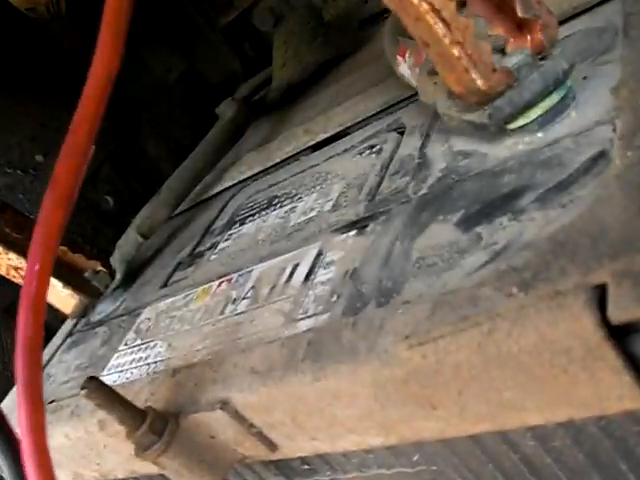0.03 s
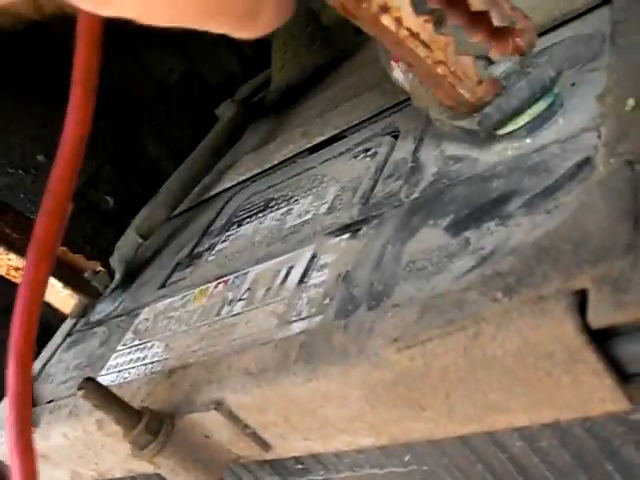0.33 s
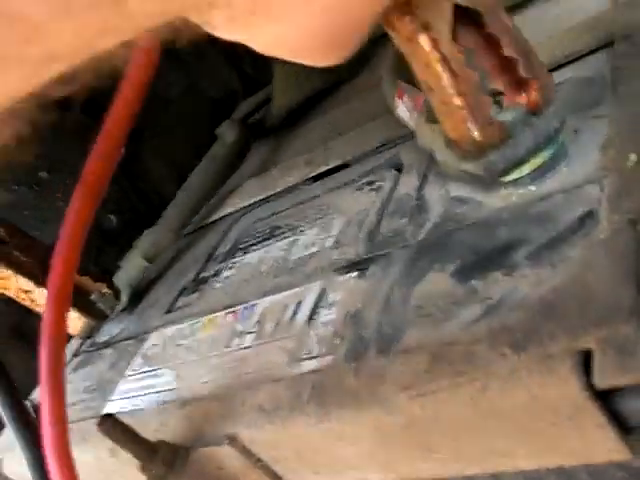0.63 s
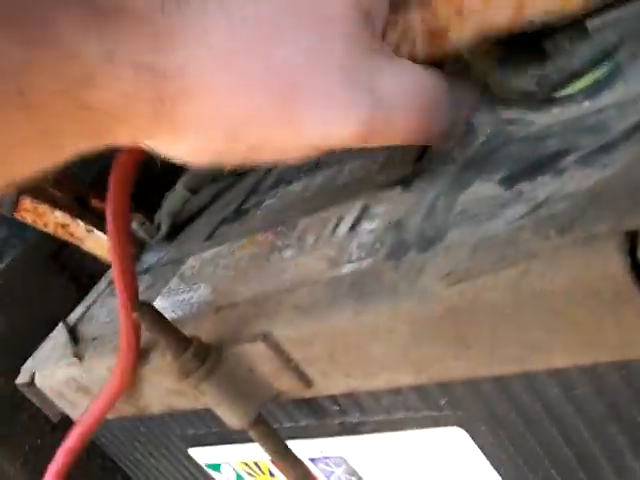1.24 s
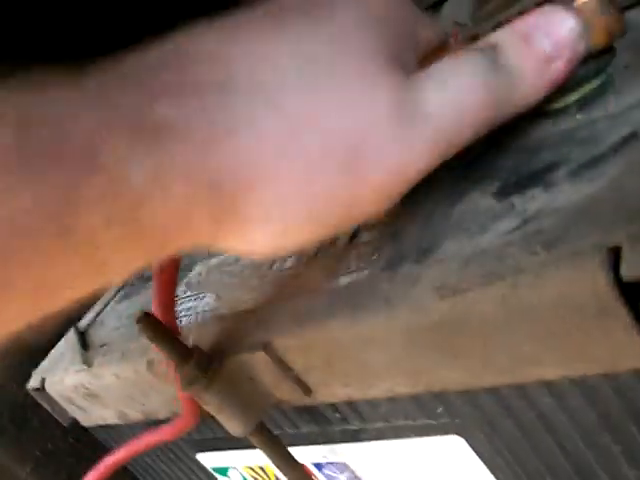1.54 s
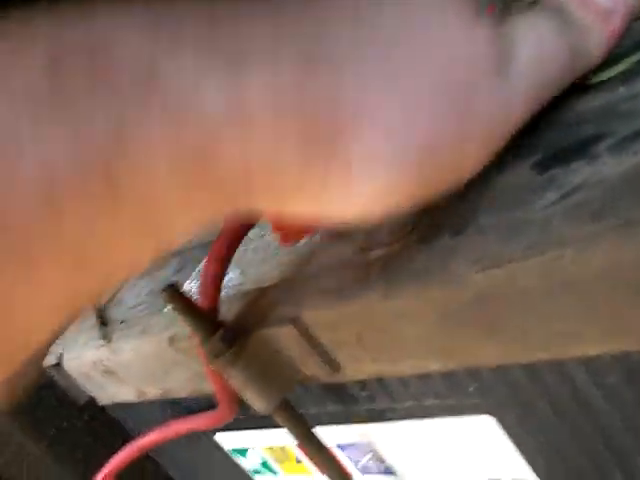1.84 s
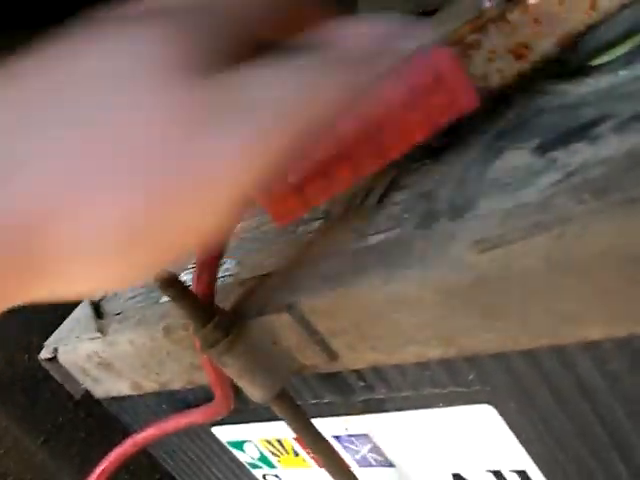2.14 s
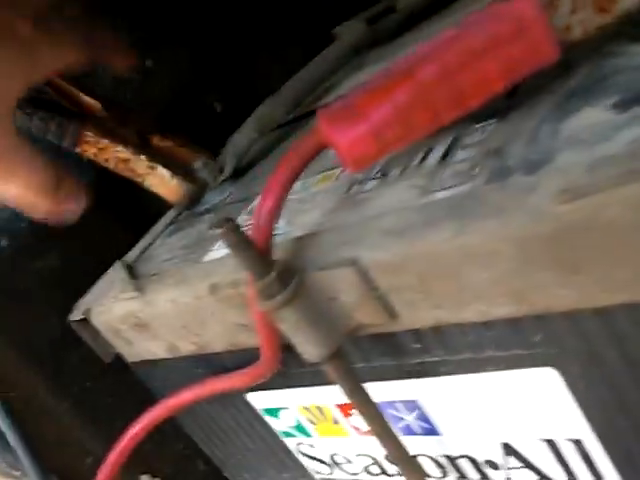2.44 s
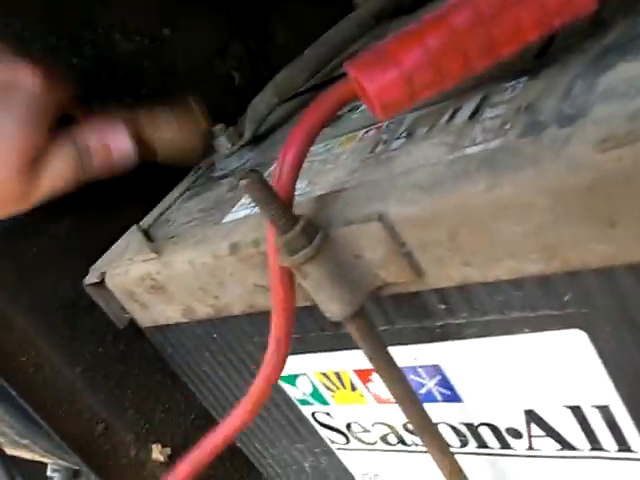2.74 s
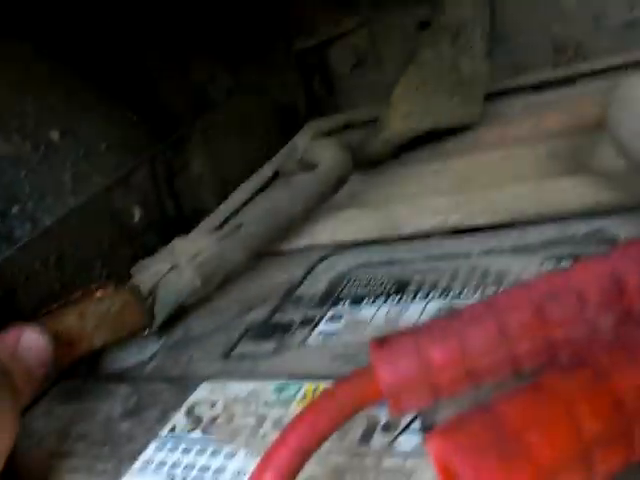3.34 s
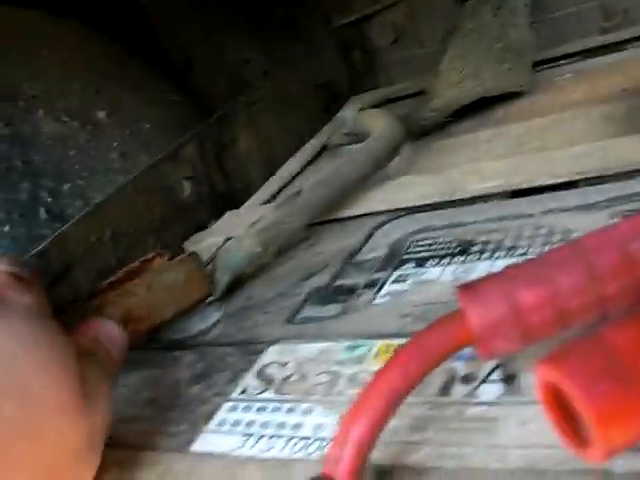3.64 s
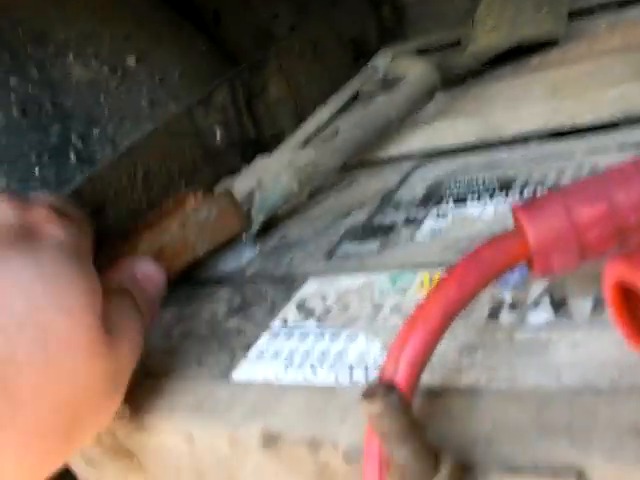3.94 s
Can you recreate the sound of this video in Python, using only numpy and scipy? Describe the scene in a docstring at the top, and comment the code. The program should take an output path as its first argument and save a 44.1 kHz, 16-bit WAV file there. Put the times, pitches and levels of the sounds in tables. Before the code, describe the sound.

A steel jumper clamp clicks, slips and snaps onto a battery terminal close to the microphone, thumping the case. Small clicks and scrapes of cable handling follow, while an engine idles with a low throb throughout.

```python
"""An engine idles under a faint, high ticking while a sprung jumper clamp is worked onto a battery terminal.
The steel jaws slip twice with a short groan, then snap shut at 0.9 s and thump the battery case.
Distant walls answer. The recorder's gain control ducks on the loud snaps and creeps back, so the engine
fades in again. Small clicks and scrapes follow as the cables are handled, and after 3 s a boom from
one corner of the engine bay swells."""
import sys
import numpy as np
from scipy import signal
from scipy.fft import rfft, irfft, next_fast_len
from scipy.io import wavfile
from scipy.ndimage import uniform_filter1d, map_coordinates

SR = 44100
rng = np.random.default_rng(int(sys.argv[2]) if len(sys.argv) > 2 else 0)


def wav_record(signal):
    """Record a signal, one row per channel, as 16-bit PCM in the file named by sys.argv[1]."""
    frames = np.transpose(np.atleast_2d(signal))
    bounded = np.clip(frames, -1, 1)
    # unit amplitude maps onto the largest positive 16-bit level
    quanta = np.round(bounded * 32767).astype(np.int16)
    wavfile.write(sys.argv[1], SR, quanta)


N = 176400
TIME = np.arange(N) / SR
TOP_HZ = 12100

# idle speed of the engine (time [s], speed [turns/s])
IDLE_SPEED = [(0, 15.2), (.7, 15.2), (.85, 15.02), (1.5, 15.05), (1.7, 15.19), (3.5, 15.22), (3.8, 15.6),
              (4, 15.55)]
# tone of the body that the beats ring in (frequency [Hz], gain [dB])
BODY_EQ = [(15, -37), (45, -23.5), (62, -3), (78, 3), (106, 4), (135, -9.5), (170, 0), (200, -6),
           (243, -11.5), (290, -24), (385, -24.5), (480, -29), (900, -43.5), (2000, -57), (5000, -120)]
# tone of the rush of fan and belts (frequency [Hz], gain [dB])
RUSH_EQ = [(25, -24.5), (45, -21.5), (62, -6.5), (100, 1.5), (140, -6.5), (185, 1), (235, -5), (280, -9),
           (345, -15.5), (420, -9), (500, -16), (780, -19), (1050, -21), (1400, -30.5), (2700, -34.5),
           (4000, -40), (7000, -43), (8500, -49), (12000, -51)]
# resonances of the engine bay (frequency [Hz], lift [dB])
BAY_RESONANCES = [(316, 9.5), (385, 12.5), (556, 7.5), (760, 10), (856, 1.5)]
# the rush as the microphone moves (time [s], level [dB])
RUSH_FADER = [(0, -27.5), (.35, -26.5), (.75, -25), (1.2, -27), (2.2, -27), (3, -26.5), (3.4, -29),
              (4, -29)]
# tone of the belts' rasp (frequency [Hz], gain [dB])
RASP_EQ = [(800, -40), (1700, -13.5), (2250, -0.5), (2750, -3), (3300, -15.5), (4300, -6), (5500, -16),
           (12000, -39.5)]
# the rasp as the microphone moves (time [s], level [dB])
RASP_FADER = [(0, -54), (.7, -49), (1.3, -53.5), (4, -58.5)]
# boom from a corner of the bay, louder as the microphone nears it (time [s], level [dB])
BOOM_FADER = [(0, -39), (1.498, -41), (2.998, -40), (3.399, -29.5), (4, -31)]
# tone of the airy wash from that corner (frequency [Hz], gain [dB])
AIR_EQ = [(250, -26), (460, 3), (600, 1), (780, -13), (1000, -7), (1300, -9), (1700, -36), (3800, -34),
          (5200, -22.5), (7000, -35), (12000, -49.5)]
# scrapes of jaws and cable (time [s], length [s], level [dB], tilt [dB/octave])
SCRAPE_CUES = [(0.053, 0.11, -49, 2), (0.88, 0.0044, -23, 1), (.885, 0.0047, -7, -3.5),
               (1.394, 0.039, -38, 4), (1.515, 0.041, -46, -0.5), (1.801, 0.056, -41.5, 8.5),
               (2.628, 0.065, -40, -3), (2.711, .063, -40, -2), (3.138, .036, -40.5, -5),
               (3.286, 0.034, -42, -4.5), (3.323, 0.039, -42.5, -5), (3.843, .13, -53.5, 3)]
# tone of the steel jaws (frequency [Hz], gain [dB])
JAW_EQ = [(300, 3), (850, 2), (1150, -3), (1550, -8), (1900, -4), (2500, -2.5), (3400, -1), (4100, -1),
          (4900, -2), (6500, -6), (8200, -9.5), (12000, -13)]
# jaw contacts (time [s], level [dB], low cut [Hz], main pitch [Hz], its width [octaves], its lift [dB],
# tilt [dB/octave], clatter t60 [s], lid knock relative to the hit [dB])
CONTACT_CUES = [(.492, -41, 3000, 4450, 1, 11, -7, .011, -20),
                (0.7787, -9, 1470, 3700, 0.66, 1, 0.5, .036, -19),
                (0.835, -13, 2030, 3100, .45, 13, -5, .026, -9),
                (.8391, -11.5, 1990, 3560, 0.32, 14.5, 4.5, .02, -14),
                (0.8875, 7.5, 1900, 3400, 0.24, 10.5, 2, 0.041, -7.5),
                (0.8942, 2, 1970, 3587, .33, 11, 3.5, .014, -7),
                (1.3752, -27.5, 1990, 6500, .35, 11.5, -2.5, 0.031, -19.5),
                (1.407, -42.5, 4580, 10000, .35, 2, 0, 0.028, -27.5),
                (1.5126, -21, 1806, 2500, .35, 10, -5.5, .01, -11.5),
                (1.744, -20.5, 3200, 4300, .45, 10, -5, .0066, -14),
                (2.757, -33.5, 1200, 6020, .35, 3.5, -1, 0.029, -20.5),
                (3.1975, -21.5, 1900, 2850, 0.31, 11.5, -4, 0.038, -9.5),
                (3.253, -37, 2000, 2700, 0.35, 12, -2.5, .026, -15.5),
                (3.2688, -29, 2000, 3150, 0.49, 9, -8, .022, -7),
                (3.2727, -33, 1600, 2100, .4, 8, -8, .022, -8),
                (3.286, -35, 2200, 3500, .6, 3, -7, .036, -4),
                (3.434, -44.5, 4500, 5500, .35, 6, 1.5, .03, -20.5),
                (3.5653, -34, 1000, 2180, .4, 3.5, -7, .03, 2)]
# ring of the clamp (frequency [Hz], level [dB], t60 before the cap in ringing() [s])
CLAMP_MODES = [(1800, -3, 0.032), (2320, -7, .025), (2720, 1, 0.025), (3030, -6, .022), (3520, -2.5, .024),
               (3780, 0.5, 0.026), (4130, -3.5, .025), (4822, -2, 0.044), (5730, -6, 0.045),
               (6295, -6, .035), (6950, -6, 0.03), (8700, -6, 0.029)]
# hollow knock of the case lid (frequency [Hz], level [dB], t60 before the cap in ringing() [s])
LID_MODES = [(560, -7, .02), (715.6, -1, 0.038), (890, 0, 0.017), (1080, -1, 0.012)]
# jaws sliding on the terminal (time [s], length [s], start pitch [Hz], end pitch [Hz], level [dB])
GROAN_CUES = [(0.76, 0.042, 599.6, 921, -41.5), (0.837, .036, 919, 553, -28.5)]
# blows to the battery case (time [s], level [dB])
THUMP_CUES = [(0.7793, -23.5), (0.8888, 11.5)]
# echoes from distant walls (delay [s], level [dB], t60 [s])
WALL_ECHOES = [(.092, -36.5, 0.16), (0.178, -45.5, 0.043)]


def amp(db):
    """Decibels to gain."""
    return 10 ** (np.asarray(db) / 20)


def unit(x):
    """Scale to rms 1."""
    return x / np.sqrt(np.mean(x ** 2) + 1e-20)


def blow(x):
    """Scale a hit so that its energy equals 8 ms at rms 1."""
    return x / np.sqrt(np.sum(x ** 2) / (.008 * SR) + 1e-20)


def eq(points):
    """Gain against frequency, through (Hz, dB) points on a log axis."""
    hz, db = np.transpose(points)
    return lambda f: amp(np.interp(np.log(f + 1), np.log(hz + 1), db))


def peak(hz, width_hz):
    """Resonance curve: 1 at hz, a half at width_hz to either side."""
    return lambda f: 1 / (1 + ((f - hz) / width_hz) ** 2)


def high_cut(hz):
    """Gain curve that dulls the treble above hz."""
    return lambda f: 1 / (1 + (f / hz) ** 4)


def low_cut(hz):
    """Gain curve that thins the bass below hz."""
    return lambda f: 1 / np.sqrt(1 + (hz / (f + 1)) ** 6)


def fader(points):
    """Gain ride over the scene, through (s, dB) points."""
    return amp(np.interp(TIME, *np.transpose(points)))


def fade(t, t60):
    """Exponential decay, 60 dB down at t60."""
    return np.exp(-np.log(1000) * t / t60)


def wobble(rate):
    """A smooth random curve, rate knots a second."""
    return map_coordinates(rng.standard_normal(int(N * rate / SR) + 4), [np.arange(N) * rate / SR])


def coloured(x, gain):
    """x through a minimum-phase filter with the given gain against frequency."""
    m = 2 * next_fast_len(len(x))
    cepstrum = irfft(np.log(np.maximum(gain(np.fft.rfftfreq(m, 1 / SR)), 1e-6)), m)
    cepstrum[1:m // 2] *= 2
    cepstrum[m // 2 + 1:] = 0
    return irfft(rfft(x, m) * np.exp(rfft(cepstrum)), m)[:len(x)]


def steel(x, low_hz, tilt_db):
    """Thin out the bass of a metal sound, tilt its treble by tilt_db an octave and trim the very top."""
    def gain(f):
        tilt = amp(tilt_db * np.log2(np.clip(f, 1000, TOP_HZ) / 4000))
        return tilt * low_cut(low_hz)(f) / np.sqrt(1 + (f / TOP_HZ) ** 40)
    return coloured(x, gain)


def ringing(modes, t, max_t60=.035):
    """Damped modes, their decay capped, each a little louder or softer at every blow."""
    ring = np.zeros(len(t))
    for hz, db, t60 in modes:
        envelope = amp(db + rng.normal(0, 2)) * fade(t, min(t60, max_t60))
        ring += envelope * np.sin(2 * np.pi * (hz * t + rng.random()))
    return blow(ring)


def add(track, s, x):
    """Mix x into the track at time s."""
    i = max(round(s * SR), 0)
    track[i:i + len(x)] += x[:max(N - i, 0)]


def throb(turns, offbeat_turns=.517, offbeat_db=-1.5, scatter_db=1.06, jitter_s=.00018):
    """Two slightly uneven beats a turn, a push and a pull, ring the engine's body."""
    beats = np.zeros(N)
    for turn in range(int(turns[-1]) + 1):
        for offset, push in (0, 1), (offbeat_turns, -amp(offbeat_db)):
            size, late = rng.standard_normal(2)
            s = np.interp(turn + offset, turns, TIME) + jitter_s * late
            add(beats, s, push * amp([scatter_db * size]))
    return unit(coloured(beats, eq(BODY_EQ)))


def engine(first_beat_s=.0165, pulse_db=.5, waver_db=.5, crest_turns=.033, hum_order=3.5):
    """The engine throbs over a low hum; the fan's rush and the belts' rasp swell with each beat."""
    turns = np.cumsum(np.interp(TIME, *np.transpose(IDLE_SPEED))) / SR - first_beat_s * IDLE_SPEED[0][1]
    body = throb(turns)
    pulse = np.cos(2 * np.pi * 2 * (turns - crest_turns))
    swell = amp(pulse_db * pulse + waver_db * wobble(9))
    bay = lambda f: amp(sum(db * peak(hz, width_hz=8.8)(f) for hz, db in BAY_RESONANCES))
    rush = unit(coloured(swell * rng.standard_normal(N), lambda f: eq(RUSH_EQ)(f) * bay(f)))
    rasp = unit(coloured(swell * rng.standard_normal(N), eq(RASP_EQ)))
    hum = unit(np.sin(2 * np.pi * hum_order * turns))
    return amp(-22) * body + fader(RUSH_FADER) * rush + fader(RASP_FADER) * rasp + amp(-37) * hum


def corner_boom(air_db=-10):
    """A narrow cavity resonance stirred by the engine, with an airy wash around it."""
    drone = coloured(rng.standard_normal(N), peak(hz=246.4, width_hz=10))
    air = coloured(rng.standard_normal(N), eq(AIR_EQ))
    return fader(BOOM_FADER) * (unit(drone) + amp(air_db) * unit(air))


def scrapes(grain_db=1.5):
    """Short grainy strokes of metal on metal."""
    out = np.zeros(N)
    for s, length, db, tilt_db in SCRAPE_CUES:
        n = int(length * SR)
        grains = (rng.standard_normal(N) * amp(grain_db * wobble(430)))[:n]
        stroke = steel(coloured(grains, eq(JAW_EQ)), low_hz=1300, tilt_db=tilt_db)
        add(out, s, amp(db) * unit(stroke) * np.sqrt(np.abs(np.hanning(n))))
    return out


def ticking(first_s=.077, every_s=.1985, db=-56):
    """A thin, regular tick, about five times a second."""
    out, t = np.zeros(N), np.arange(SR // 20) / SR
    for s in np.arange(first_s, N / SR, every_s):
        burst = rng.standard_normal(len(t)) * fade(t, t60=.012)
        add(out, s, amp(db) * blow(coloured(burst, peak(hz=9900, width_hz=450))))
    return out


def clamp(click_db=-4, crack_db=-.5, ring_db=-9.5, rattle_db=-13, rattle_stretch=3.1):
    """Each contact clicks, cracks and clatters; the jaws ring, spring and handles rattle, the lid knocks."""
    out, t = np.zeros(N), np.arange(SR // 5) / SR
    for s, db, low_hz, main_hz, octaves, lift_db, tilt_db, t60, knock_db in CONTACT_CUES:
        clatter_noise, crack_noise, rattle_noise = rng.standard_normal((3, len(t)))
        click = amp(click_db) * blow(1.0 * (t == 0))
        crack = amp(crack_db) * blow(crack_noise * fade(t, t60=.013))
        # the spot struck gives the attack its pitch
        spot = lambda f: amp(lift_db * np.exp(-(np.log2((f + 1) / main_hz) / octaves) ** 2))
        attack = coloured(click + crack, spot)
        clatter = coloured(attack + blow(clatter_noise * fade(t, t60)), eq(JAW_EQ))
        ring = amp(ring_db) * ringing(CLAMP_MODES, t)
        rattle = coloured(rattle_noise * fade(t, rattle_stretch * t60), high_cut(5500))
        hit = steel(blow(clatter) + ring + amp(rattle_db) * blow(rattle), low_hz, tilt_db)
        knock = amp(knock_db) * ringing(LID_MODES, t)
        add(out, s, amp(db) * (blow(hit) + knock))
    return out


def groans(roughness_rad=1.5):
    """A rough gliding tone from the teeth dragging over lead."""
    out = np.zeros(N)
    for s, length, start_hz, end_hz, db in GROAN_CUES:
        n = int(length * SR)
        glide = 2 * np.pi * np.cumsum(np.linspace(start_hz, end_hz, n)) / SR
        tone = np.sin(glide + roughness_rad * wobble(340)[:n])
        arch = np.sin(np.linspace(0, np.pi, n))
        add(out, s, amp(db) * unit(tone * arch))
    return out


def battery_thumps(case_hz=84, knock_hz=200, knock_db=-4.5):
    """The heavy plastic case gives a dead thump: a low note with a shorter knock on top."""
    out, t = np.zeros(N), np.arange(SR // 5) / SR
    low = blow(np.sin(2 * np.pi * case_hz * t) * fade(t, t60=.062))
    knock = blow(np.sin(2 * np.pi * knock_hz * t) * fade(t, t60=.032))
    thump = coloured(low + amp(knock_db) * knock, low_cut(35.4))
    for s, db in THUMP_CUES:
        add(out, s, amp(db) * blow(thump))
    return out


def wall_echoes(x):
    """Distant walls throw back dull, smeared copies of x."""
    answer, t = np.zeros(N), np.arange(SR // 3) / SR
    for delay, db, t60 in WALL_ECHOES:
        echo = coloured(rng.standard_normal(len(t)) * fade(t, t60), high_cut(3700))
        add(answer, delay, amp(db) * echo / np.linalg.norm(echo))
    return signal.fftconvolve(x, answer)[:N]


def scene():
    """Clamp and battery close by, over the idling engine; only the metal feeds the echoes."""
    metal = clamp() + scrapes() + groans()
    return (metal + wall_echoes(metal) + battery_thumps() + engine() + corner_boom() + ticking())[None]


def record(dry, ceiling_db=-18, recover_db_per_s=4.5, lookahead_s=.001, overload=.78):
    """The gain ducks when the treble passes the ceiling and creeps back; then soft clip and band limits."""
    treble = signal.sosfilt(signal.butter(2, 700, 'high', fs=SR, output='sos'), dry[0])
    power = uniform_filter1d(treble ** 2, size=353, origin=176 - int(lookahead_s * SR))  # 8 ms window
    excess_db = np.maximum(10 * np.log10(np.abs(power) + 1e-12) - ceiling_db, 0)
    recovery_db = recover_db_per_s * TIME
    duck_db = np.maximum.accumulate(excess_db + recovery_db) - recovery_db
    ducked = dry * amp(-uniform_filter1d(duck_db, size=64))
    clipped = ducked / (1 + np.abs(ducked / overload) ** 8) ** (1 / 8)
    m = next_fast_len(N + SR // 2)
    f = np.fft.rfftfreq(m, 1 / SR)
    top_edge = (1 - np.tanh((f - TOP_HZ) / 70)) / 2
    band = top_edge * low_cut(28)(f) ** 2
    return irfft(rfft(clipped, m) * band, m)[:, :N]


dry = scene()
out = record(dry)
wav_record(out)
```